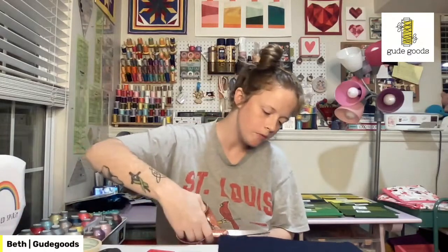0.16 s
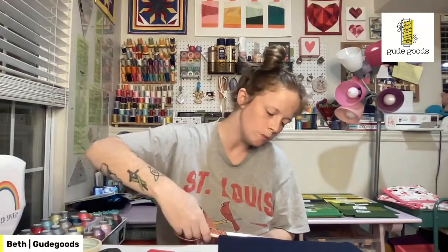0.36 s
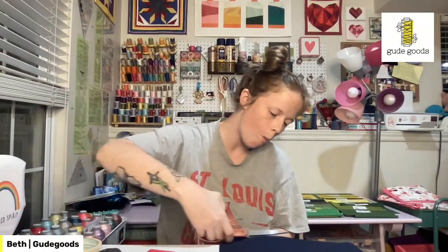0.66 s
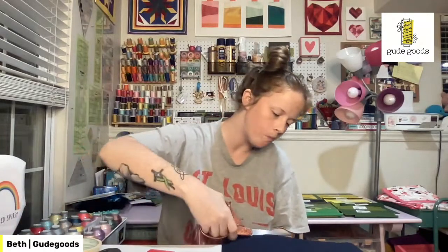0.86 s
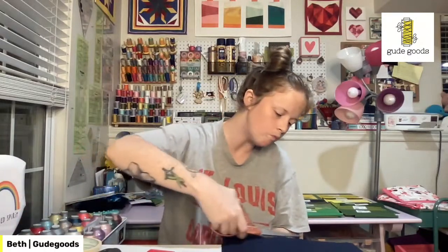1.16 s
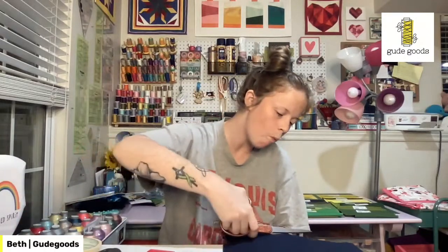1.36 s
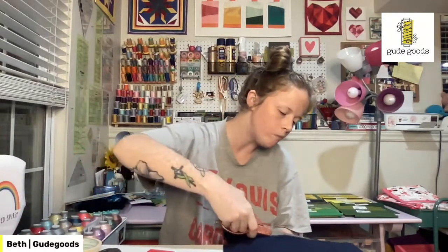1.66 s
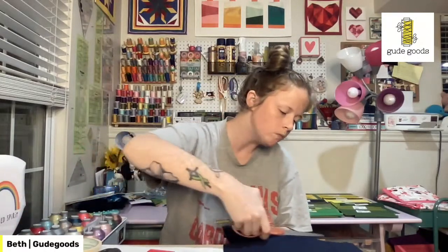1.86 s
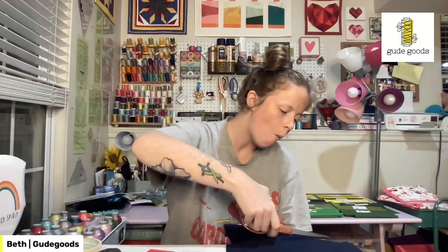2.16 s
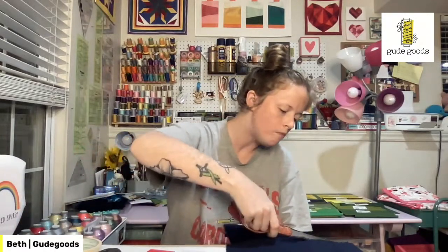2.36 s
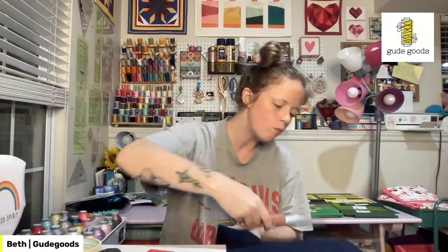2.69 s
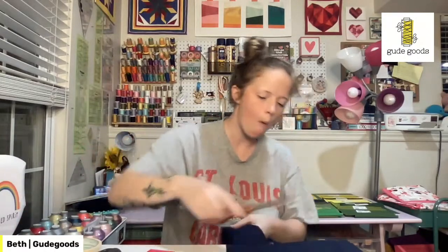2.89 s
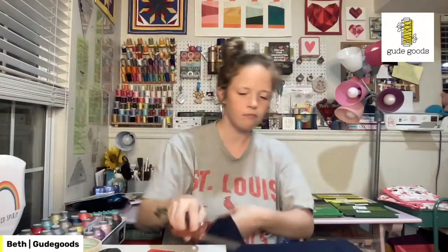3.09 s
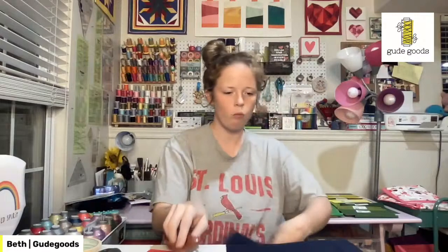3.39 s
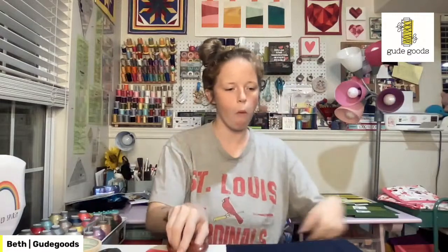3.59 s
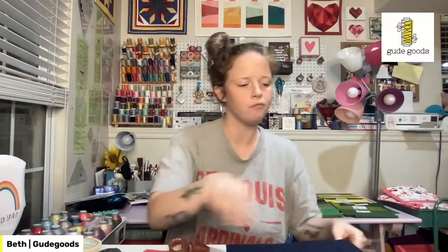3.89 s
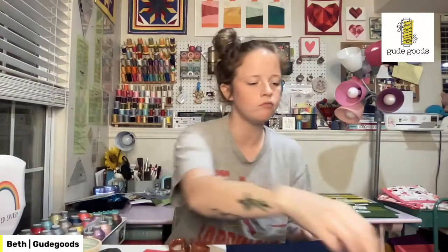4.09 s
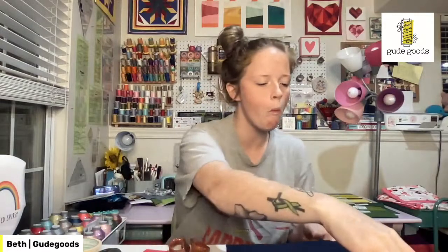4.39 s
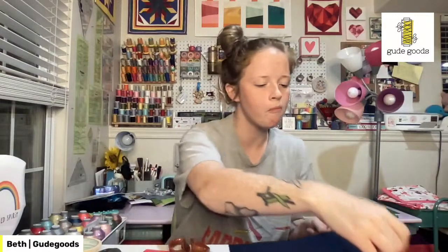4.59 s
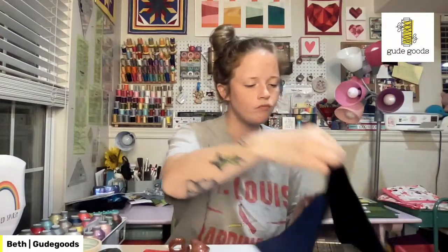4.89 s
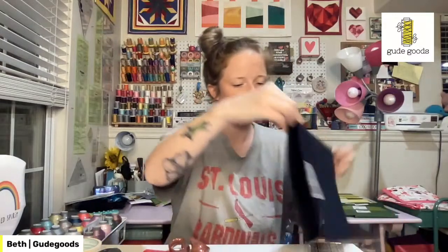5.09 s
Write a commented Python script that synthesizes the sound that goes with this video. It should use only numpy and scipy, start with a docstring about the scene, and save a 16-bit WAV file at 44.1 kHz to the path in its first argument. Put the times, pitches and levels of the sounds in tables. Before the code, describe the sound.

Scissors crunch through fabric in four crisp cuts, then clatter onto a table in two hard knocks, followed by a soft hand bump.

```python
"""Small sewing room, one microphone channel; the direct sound stands ahead of a short room reply. A soft low
room noise and a faint cloth rustle lie under everything, both made of filtered noise or clicks. Steel
dressmaking scissors make four cuts: crunching thread clicks, scraping edges, chirps and a closing snap. Then
they are laid on the table and nudged, in six bouncing, clattering landings: noise bursts, steel and table
modes. Last, a hand bumps the table and picks up the cloth: dull thuds and gritty scuffs."""
import sys
import numpy as np
from scipy import signal
from scipy.fft import rfft, irfft, next_fast_len
from scipy.io import wavfile
from scipy.ndimage import uniform_filter1d, map_coordinates

SR = 44100
rng = np.random.default_rng(int(sys.argv[2]) if len(sys.argv) > 2 else 0)


def store_pcm(level_fs):
    """Save levels as 16-bit WAV."""
    pcm = np.round(np.clip(level_fs, -1, 1) * 32767).astype(np.int16)
    wavfile.write(sys.argv[1], SR, np.atleast_2d(pcm).T)


N = 231480

# All levels are relative: each source trims its own in the mix. A width is that of one resonance.
# Room noise spectrum: (frequency [Hz], level [dB])
AIR_SPECTRUM = [(15, -53.5), (25, -17), (76, -20.5), (144, -2), (170, -2), (235, -1), (414, -6), (604, -10),
                (834, -22.5), (1730, -22), (2150, -27.5), (3880, -32), (7220, -42.5), (8730, -33),
                (15800, -49)]
# Room noise over time: (time [s], level [dB])
AIR_LEVEL = [(0, -67), (1.5, -66), (3.4, -66.5), (4.1, -69), (4.7, -70.5), (5.25, -70.5)]
# Cloth sliding: (time [s], level [dB])
CLOTH_LEVEL = [(0, -87.5), (3.1, -85), (4.3, -78), (5.25, -77.5)]
# Colour of the cloth rustle: (frequency [Hz], level [dB])
RUSTLE_SPECTRUM = [(400, -11), (1200, 1), (3000, -7), (7000, -8.5), (10000, -19), (15000, -25)]
# Closing strokes; a bite ahead of the start leaves a crunch that only fades: (start [s], deepest bite [s],
# end [s], thread crunch at the bite [dB], crunch drop away from the bite [dB], blade scrape [dB])
STROKES = [ (0.337, 0.469, 0.57, -52.5, 25, -64.5), (1.021, 1.086, 1.165, -54.5, 9, -63.5),
           (1.623, 1.702, 1.769, -55, 7.7, -61.5), (2.465, 2.514, 2.53, -56, 6, -65),
           (2.575, 2.54, 2.655, -49.5, 4.6, -56)]
# Colour of parting threads: (frequency [Hz], level [dB])
CRUNCH_SPECTRUM = [(3500, -20.5), (6000, -18), (6950, -4), (7700, -9.5), (8300, 2.5), (8600, -9.5),
                   (9050, -2), (9600, -5.5), (10100, -1), (10800, -9.5), (11700, -5.5), (12300, -15),
                   (15000, -23), (15800, -17.5)]
# Thin ringing of the blades as they cut: (frequency [Hz], width [Hz], level [dB])
EDGE_MODES = [(5630, 81, 3.5), (7986, 51, -9.5), (8940, 56, -1), (8840, 160, 22), (9340, 81, -25.5),
              (11220, 210, -2.5)]
# Edge sliding on edge: (frequency [Hz], width [Hz], level [dB])
SCRAPE_MODES = [(3480, 180, 2), (4330, 255, 9.5), (5270, 240, 7.5), (5800, 300, -0.5)]
# An edge catches and chirps: (time [s], level [dB], pitch [Hz])
CHIRPS = [(0.343, -54, 3360), (0.455, -49, 5020), (0.469, -56.5, 2550), (0.502, -50.5, 3065),
          (0.542, -52, 2490), (1.034, -48.5, 5090), (1.065, -49.5, 4520), (1.117, -53.5, 4400),
          (1.714, -51, 2520), (1.755, -54.5, 2050), (2.599, -43.5, 2200)]
# The blades break through or meet: (time [s], level [dB], pitch [Hz], treble [dB], t60 [s])
SNAPS = [(0.507, -48, 3500, -7, 0.05), (0.548, -54, 3970, -12, 0.042), (1.14, -42, 3260, -14, 0.028),
         (1.156, -51, 4050, -13, 0.05), (1.758, -47, 3950, -8, 0.043), (2.57, -33.5, 4940, -8, 0.058),
         (2.601, -43.5, 3400, -28, 0.08), (2.635, -30, 3130, -2.5, 0.024)]
# The blades ring as they meet: (frequency [Hz], width [Hz], level [dB])
SNAP_MODES = [(2330, 110, -3), (3760, 590, -5), (5200, 400, -0.5), (9100, 350, 13.5)]
# Scuffs of fingers, handles and cloth: (time [s], level [dB], pitch [Hz], t60 before the swell [s], rasp [dB])
SCUFFS = [(0.856, -52, 1950, 0.014, -12), (1.372, -59, 1610, 0.054, -4.5),
          (3.421, -43.5, 1450, 0.075, -4.5), (3.479, -35.5, 1705, 0.079, -8),
          (4.147, -46.5, 2400, 0.097, -14.5), (4.281, -47.5, 1240, 0.026, -13),
          (4.297, -63.5, 2180, 0.093, 5.5), (4.497, -53.5, 1950, 0.065, -0.5),
          (4.963, -57.5, 1810, 0.053, -5.5), (5.092, -60.5, 1730, 0.08, -0.5)]
# Soft bumps of the hand or handles on the table: (time [s], thud [dB], thud pitch [Hz], tock [dB])
BUMPS = [(2.632, -43, 436, -60), (4.064, -89, 395, -46), (4.453, -30, 211, -43), (4.49, -42, 271, -40),
         (4.501, -48, 300, -37.5)]
# Modes of the table top: (frequency [Hz], level [dB], t60 [s])
TABLE_MODES = [(112.8, -20, 0.1), (165.7, -2, 0.154), (201.4, -20.5, 0.059), (236.4, -5.5, 0.31),
               (265.6, 14.5, 0.027), (375, 8, 0.03), (447.6, -3.5, 0.061), (487, 1.5, 0.057),
               (635.4, -20, 0.15), (744, 6.5, 0.033)]
# How the table radiates: (frequency [Hz], level [dB])
TABLE_SPECTRUM = [(30, -40.5), (70, -20), (110, -4.5), (160, -1), (750, 1.5), (1000, -6.5), (2500, -52.5)]
# The scissors land on the table or are nudged: (time [s], clack [dB], treble [dB], steel ring [dB],
# thud [dB], thud pitch [Hz], handle tock [dB], first bounce [s], loss a bounce [dB])
CONTACTS = [(3.485, -45, -5, -17, -49.5, 440, -58, 0.008, 4.5),
            (3.602, -17.5, -14, -4.5, -18, 214.6, -22, 0.024, 7.5),
            (3.696, -24, 0, 3.5, -31.5, 228, -34, 0.0093, 3.5),
            (3.851, -29, -12, -15, -24, 321, -29.5, 0.024, 4.5),
            (3.907, -30, -6.5, 3.5, -32, 236, -23.5, 0.01, 3),
            (4.582, -37.5, -47, -6, -52, 252, -50, 0.008, 16)]
# Colour of the first touch and the chatter: (frequency [Hz], level [dB])
CLACK_SPECTRUM = [(350, -16.5), (760, 10.5), (950, -15.5), (1200, 3.5), (1650, 0), (2020, 5), (2300, 7),
                  (2900, -6.5), (3500, -1), (4100, -9), (4650, -10), (5050, 2.5), (5800, -14.5),
                  (8000, -27.5), (15000, -57.5)]
# Crisp top of a contact: (frequency [Hz], level [dB])
CRACK_SPECTRUM = [(3500, -2.5), (6000, -1.5), (7200, -4.5), (9900, -1.5), (11500, -12.5), (12500, -20.5),
                  (15500, -25)]
# Modes of the scissor steel, scattered at each blow: (frequency [Hz], level [dB], t60 [s])
STEEL_MODES = [(678.6, -8, 0.19), (1265, -13, 0.15), (1421, -5.5, 0.065), (1630, -9.5, 0.117),
               (1853, -39, 0.2), (2095, -1.5, 0.14), (2180, -1, 0.14), (2328, 5, 0.087), (3980, 6.5, 0.032),
               (4170, -12.5, 0.2), (4570, -28, 0.068), (5420, -15, 0.034), (5890, -6, 0.063),
               (8350, -29, .07), (8400, -32, 0.049), (10500, -35, 0.064)]
# Decay of the room: (frequency [Hz], t60 [s])
ROOM_DECAY = [(150, 0.26), (500, 0.22), (2000, 0.21), (6000, 0.18), (14000, 0.17)]

ATTACK_S, RELEASE_S = 0.012, 0.0065  # the blades set off; the blades come to rest
CHIRP_WIDTH_HZ, CHIRP_T60_S, CHIRP_RISE_S, CHIRP_TREBLE_DB = 200, 0.02, 0.0027, -20.5
SNAP_WIDTH_HZ, SNAP_RISE_S = 1400, 0.0045
SCUFF_WIDTH, SCUFF_RISE_S = 0.3, 0.0056  # share of the pitch; skin and cloth ease into contact
RASP_HZ, RASP_WIDTH_HZ = 2590, 1160  # the dry top of every scuff
THUD_SOFT_S, TOCK_SOFT_S, TOCK_HZ = 0.0035, 0.0017, 548
BOUNCE_SHRINK = 0.85  # each flight over the one before
LEAD_S, LEAD_DB = 0.0045, -10  # one end grazes the table just before the blow
CLACK_RISE_S = 0.00067  # steel on a hard table top
GRIP_S = 0.072  # time for the fingers to choke the steel
HUM_S, HUM_DB, HUM_HZ = 3.696, -42.5, 677  # lowest mode of the steel
HUM_SWELL_S, HUM_FREE_S = 0.062, 0.11
TOP_HZ = 15800  # band limit of the recorder


def amp(db):
    """Decibels to gain."""
    return 10 ** (np.asarray(db) / 20)


def unit(x):
    """Scale to rms 1."""
    return x / np.sqrt(np.mean(x ** 2) + 1e-20)


def along(points, hz):
    """Read (frequency [Hz], value) points on a log frequency axis."""
    f, v = np.transpose(points)
    return np.interp(np.log(hz + 1), np.log(f + 1), v)


def level(rows):
    """Gain per sample from a (time [s], level [dB]) curve."""
    s, db = np.transpose(rows)
    return amp(np.interp(np.arange(N) / SR, s, db))


def coloured(x, spectrum, size=2048):
    """Causal minimum-phase filter with the gain of (frequency [Hz], level [dB]) points."""
    cepstrum = irfft(np.log(amp(along(spectrum, np.fft.rfftfreq(size, 1 / SR))) + 1e-6))
    # fold the cepstrum forward in time, so that nothing sounds early
    cepstrum[1:size // 2] *= 2
    cepstrum[size // 2 + 1:] = 0
    impulse = irfft(np.exp(rfft(cepstrum)))
    return signal.fftconvolve(x, impulse)[:len(x)]


def air():
    """Room noise: coloured random noise whose level drifts slowly."""
    return level(AIR_LEVEL) * unit(coloured(rng.standard_normal(N), AIR_SPECTRUM))


def grains(rate, spread_db):
    """Tiny clicks of uneven size and sign at random moments, rate a second on average."""
    happens = rng.random(N) < rate / SR
    sign = rng.choice([-1, 1], N)
    return happens * sign * amp(spread_db * np.clip(rng.standard_normal(N), -2, 2))


def rustle():
    """Sliding cloth: a dense stream of tiny fibre clicks, coloured."""
    return level(CLOTH_LEVEL) * unit(coloured(grains(rate=3300, spread_db=0.5), RUSTLE_SPECTRUM))


def filtered(x, response):
    """x times a response of frequency, padded so that tails do not wrap round."""
    m = next_fast_len(len(x) + 8192)
    return irfft(rfft(x, m) * response(np.fft.rfftfreq(m, 1 / SR)), m)[:len(x)]


def resonance(f, hz, width):
    """Response of one damped mode."""
    return 1j * f * width / (hz * hz - f * f + 1j * f * width)


def ringing(x, modes):
    """x through a set of (frequency [Hz], width [Hz], level [dB]) resonances, at rms 1."""
    def response(f):
        """Parallel modes with alternating sign."""
        return sum(amp(db) * resonance(f, hz, width) * (-1) ** k
                   for k, (hz, width, db) in enumerate(modes))
    return unit(filtered(x, response))


def shifting(x, depth_db, size):
    """The contact point travels along the edges, so resonances come and go."""
    z = signal.stft(x, nperseg=size)[2]
    field = uniform_filter1d(rng.standard_normal(z.shape), size=3, axis=0)  # across frequency
    field = uniform_filter1d(field, size=6, axis=1)  # across time
    return signal.istft(z * amp(depth_db * unit(field)), nperseg=size)[1][:N]


def wobble(rate):
    """A smooth random curve, rate knots a second."""
    knots = rng.standard_normal(int(N * rate / SR) + 4)
    return map_coordinates(knots, [np.arange(N) * rate / SR])


def strokes():
    """Gains of crunch and scrape: even scrape while the edges move, crunch strongest at the deepest bite."""
    t, crunch, scrape = np.arange(N) / SR, np.zeros(N), np.zeros(N)
    for start, bite, end, crunch_db, drop_db, scrape_db in STROKES:
        moving = np.exp(-np.maximum(start - t, 0) / ATTACK_S - np.maximum(t - end, 0) / RELEASE_S)
        crunch += moving * amp(crunch_db - drop_db * np.interp(t, [start, bite, end], [1, 0, 1]))
        scrape += moving * amp(scrape_db)
    return crunch, scrape


def cutting(crunch_db=-2, edge_db=-7, scrape_db=-3):
    """Threads part in uneven bunches while the edges scrape and excite the blades."""
    crunch, scrape = strokes()
    threads = shifting(grains(rate=3500, spread_db=4.5), depth_db=3, size=512)
    threads = threads * amp(1.8 * wobble(150))  # bunching
    parting = amp(crunch_db) * unit(coloured(threads, CRUNCH_SPECTRUM))
    edges = amp(edge_db) * ringing(threads, EDGE_MODES)
    sliding = amp(scrape_db) * ringing(threads, SCRAPE_MODES)
    return crunch * (parting + edges) + scrape * sliding


def age():
    """Time since a contact, a quarter of a second long."""
    return np.arange(SR // 4) / SR


def burst(t60, rise):
    """Noise that swells over rise [s] and dies away."""
    t = age()
    return rng.standard_normal(len(t)) * amp(-60 * t / t60) * (1 - np.exp(-t / rise))


def blow(x):
    """Scale a short sound to the energy of 5 ms at rms 1."""
    return x / np.sqrt(np.sum(x ** 2) / (.005 * SR) + 1e-20)


def add(track, s, sound):
    """Mix a sound into a track at time s."""
    part = track[round(s * SR):][:len(sound)]
    part += sound[:len(part)]


def band(x, hz, width_hz):
    """Keep a band with steep skirts: three resonances in series."""
    def response(f):
        """Product of ever wider modes at one pitch."""
        return (resonance(f, hz, width_hz) * resonance(f, hz, 2 * width_hz)
                * resonance(f, hz, 4 * width_hz))
    return filtered(x, response)


def slip(hz, width_hz, t60, top_db, rise):
    """One slip of the blades: a burst around a pitch, with a crisp top."""
    body = blow(band(burst(t60, rise), hz, width_hz))
    top = blow(coloured(burst(t60, rise), CRUNCH_SPECTRUM))
    return body + amp(top_db) * top


def chirps(chirp_db=-8):
    """Narrow noise bursts during the strokes, where an edge catches."""
    out = np.zeros(N)
    for s, db, hz in CHIRPS:
        chirp = slip(hz, CHIRP_WIDTH_HZ, CHIRP_T60_S, CHIRP_TREBLE_DB, CHIRP_RISE_S)
        add(out, s, amp(db + chirp_db) * chirp)
    return out


def snaps(snap_db=-9, ring_db=-4, treble_db=-3):
    """Broad bursts that ring the blades where they break through or meet."""
    out = np.zeros(N)
    for s, db, hz, top_db, t60 in SNAPS:
        strike = band(burst(t60, SNAP_RISE_S), hz, hz)
        ring = amp(ring_db) * blow(ringing(strike, SNAP_MODES))
        snap = slip(hz, SNAP_WIDTH_HZ, t60, top_db + treble_db, SNAP_RISE_S)
        add(out, s, amp(db + snap_db) * (snap + ring))
    return out


def rattle(t60, rise, grit_db, size=64):
    """A burst broken into uneven little impacts, each size samples long."""
    x = burst(t60, rise)
    steps = np.clip(rng.standard_normal(len(x) // size + 1), -2, 2)
    return x * amp(grit_db * np.repeat(steps, size)[:len(x)])


def scuffs(scuff_db=-6, swell=0.32, grit_db=1.5):
    """Brief gritty rubs swell and fade, each a pitched body under a dry rasp."""
    out = np.zeros(N)
    for s, db, hz, t60, rasp_db in SCUFFS:
        rub = rattle(t60, swell * t60, grit_db) * np.minimum(age() / SCUFF_RISE_S, 1)
        body = blow(band(rub, hz, SCUFF_WIDTH * hz))
        rasp = blow(band(rub, RASP_HZ, RASP_WIDTH_HZ))
        add(out, s, amp(db + scuff_db) * (body + amp(rasp_db) * rasp))
    return out


def bounces(s, flight, loss_db, count=4):
    """(time [s], level [dB]) of a blow and its ever quicker, weaker rebounds."""
    k = np.arange(count)
    flights = flight * BOUNCE_SHRINK ** k[:-1]
    return list(zip(s + np.cumsum(np.append(0, flights)), -loss_db * k))


def thud(hz, rise, push_db=-4, table_db=-9, focus_db=12, cycles=8):
    """A blow gives a short dull push and wakes the table modes near its pitch."""
    t = age()
    soft = 1 - np.exp(-(t / rise) ** 2)  # cloth and skin cushion the contact
    push = np.sin(2 * np.pi * hz * t) * amp(-60 * t * hz / cycles)  # 60 dB down after these cycles
    top = np.zeros(len(t))
    for f, mode_db, t60 in TABLE_MODES:
        away_db = focus_db * abs(np.log2(f / hz))  # loss per octave from the pitch
        top += amp(mode_db - away_db - 60 * t / t60) * np.sin(2 * np.pi * f * t)
    return amp(push_db) * blow(push * soft) + amp(table_db) * blow(top * soft)


def thuds():
    """The table answers every bump and every bounce of the scissors with a low thud and a higher tock."""
    out = np.zeros(N)
    landings = [(s, low_db + db, hz, tock_db + db)
                for start, _, _, _, low_db, hz, tock_db, flight, loss_db in CONTACTS
                for s, db in bounces(start, flight, loss_db)]
    for s, low_db, hz, tock_db in landings + BUMPS:
        low = amp(low_db) * thud(hz, THUD_SOFT_S)
        tock = amp(tock_db) * thud(TOCK_HZ, TOCK_SOFT_S)
        add(out, s, low + tock)
    return coloured(out, TABLE_SPECTRUM)


def steel():
    """The steel rings at new strengths with each blow until the fingers choke it."""
    t = age()
    # the loose pivot shifts each mode a little from blow to blow: level [dB], share of pitch, phase [rad]
    chance = rng.standard_normal((len(STEEL_MODES), 3)) * [2.5, .007, 2]
    ring = np.zeros(len(t))
    for (hz, mode_db, t60), (more_db, shift, phase) in zip(STEEL_MODES, chance):
        decay = amp(mode_db + more_db - 60 * t / t60)
        ring += decay * np.sin(2 * np.pi * hz * (1 + shift) * t + phase)
    return blow(ring * np.exp(-(t / GRIP_S) ** 4))


def clatter(touch_db=-11, chatter_db=-11, crack_db=-9, ring_db=-8,
            touch_t60=0.015, chatter_t60=0.025, crack_t60=0.038):
    """Each landing grazes, strikes and bounces; every contact clacks and rings the steel."""
    out = np.zeros(N)
    for start, db, top_db, steel_db, _, _, _, flight, loss_db in CONTACTS:
        for s, bounce_db in [(start - LEAD_S, LEAD_DB)] + bounces(start, flight, loss_db):
            # a hard first touch, with a brief chatter against the table top
            touch = amp(touch_db) * blow(coloured(burst(touch_t60, CLACK_RISE_S), CLACK_SPECTRUM))
            impacts = rattle(chatter_t60, CLACK_RISE_S, grit_db=1.5)
            chatter = amp(chatter_db) * blow(coloured(impacts, CLACK_SPECTRUM))
            crisp = blow(coloured(burst(crack_t60, CLACK_RISE_S), CRACK_SPECTRUM))
            crack = amp(crack_db + top_db) * crisp
            ring = amp(ring_db + steel_db) * steel()
            add(out, s, amp(db + bounce_db) * (touch + chatter + crack + ring))
    return out


def hum():
    """The lowest steel mode, a sine, swells after the landing at 3.7 s until the hand stills it."""
    out, t = np.zeros(N), age()
    free = (1 - np.exp(-t / HUM_SWELL_S)) * np.exp(-(t / HUM_FREE_S) ** 12)
    add(out, HUM_S, amp(HUM_DB) * free * np.sin(2 * np.pi * HUM_HZ * t))
    return out


def room(x, delay=0.0057):
    """The crowded little room answers after delay [s] with decaying noise; treble dies first."""
    hz, t, z = signal.stft(rng.standard_normal(SR // 2), SR, nperseg=256)
    decay = amp(-60 * t / along(ROOM_DECAY, hz)[:, None])
    tail = signal.istft(z * decay, SR, nperseg=256)[1]
    reply = np.pad(tail / np.linalg.norm(tail), (round(delay * SR), 0))
    return signal.fftconvolve(x, reply)[:N]


def scene(cut_room_db=-5, clatter_room_db=-2, thud_room_db=-8):
    """All sources, each with its share of the room, over the room noise."""
    cloth_and_blades = rustle() + cutting() + chirps() + snaps() + scuffs()
    table = thuds() + hum()
    sources = [(cloth_and_blades, cut_room_db), (table, thud_room_db), (clatter(), clatter_room_db)]
    return (air() + sum(x + amp(wet_db) * room(x) for x, wet_db in sources))[None]


def suppress(x, memory=0.041, tail_db=-8, size=256):
    """An echo suppressor turns down bands far below their recent level, but not under their steady noise."""
    z = signal.stft(x, nperseg=size)[2]
    power = uniform_filter1d(np.abs(z) ** 2, size=3, axis=0)
    power = np.abs(uniform_filter1d(power, size=3, axis=1)) + 1e-20
    keep = np.exp(-size / 2 / SR / memory)  # memory [s] as a share kept per frame
    recent = signal.lfilter([1 - keep], [1, -keep], power, axis=1)
    echo = amp(tail_db) ** 2 * recent
    steady = np.median(power, axis=1, keepdims=True)
    floor = np.sqrt(np.minimum(steady / power, 1))
    gain = np.maximum(power / (power + echo), floor)
    return signal.istft(z * gain, nperseg=size)[1][:N]


def record(dry):
    """The recorder shortens tails and keeps nothing above its band limit."""
    return filtered(suppress(dry[0]), lambda hz: hz < TOP_HZ)[None]


dry = scene()
out = record(dry)
store_pcm(out)
```